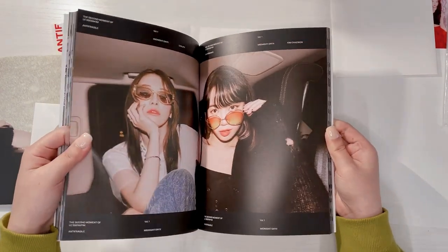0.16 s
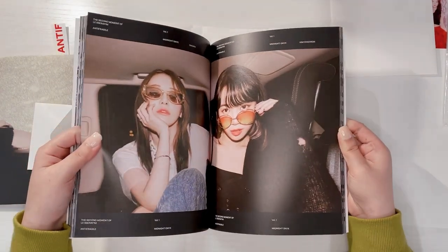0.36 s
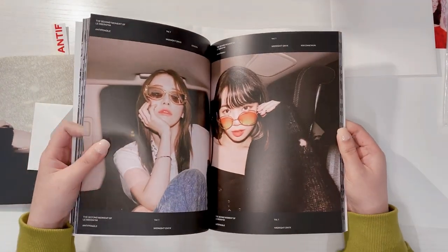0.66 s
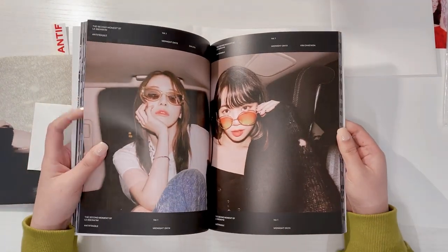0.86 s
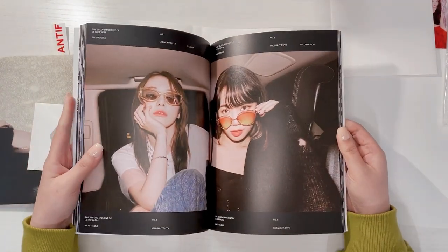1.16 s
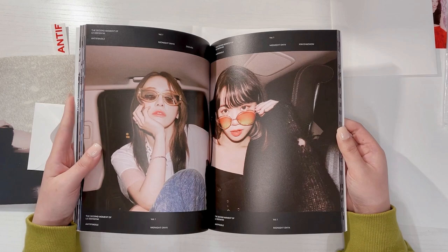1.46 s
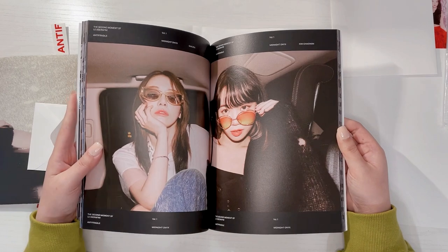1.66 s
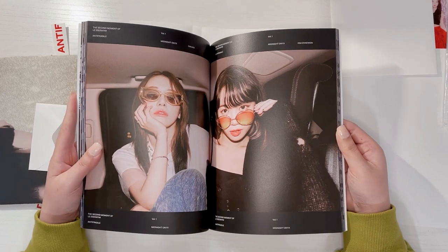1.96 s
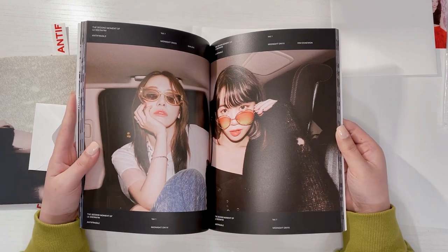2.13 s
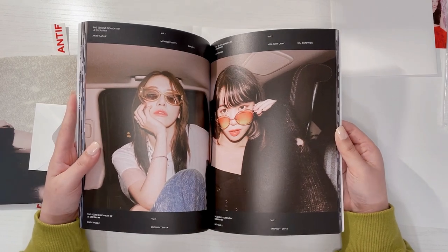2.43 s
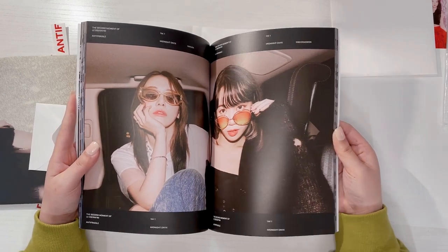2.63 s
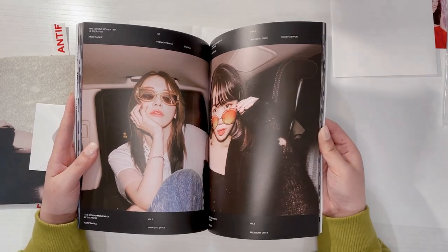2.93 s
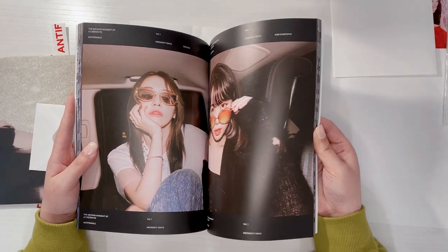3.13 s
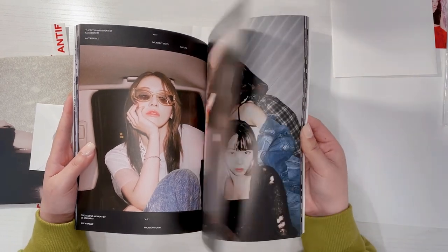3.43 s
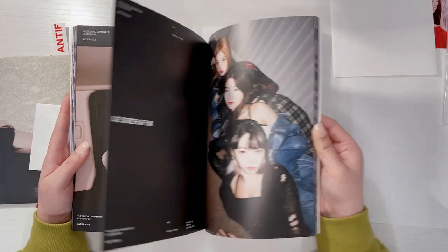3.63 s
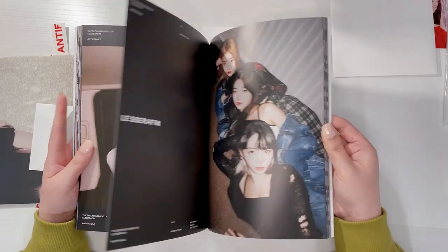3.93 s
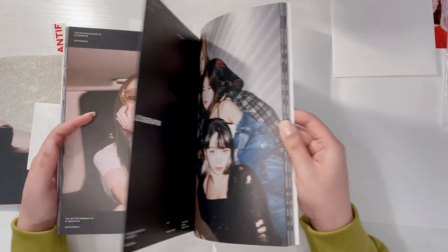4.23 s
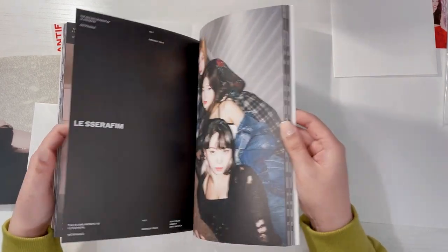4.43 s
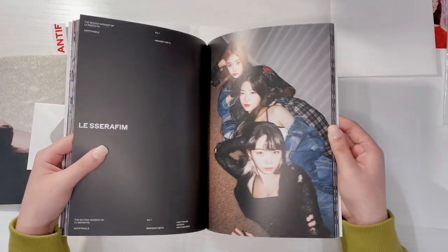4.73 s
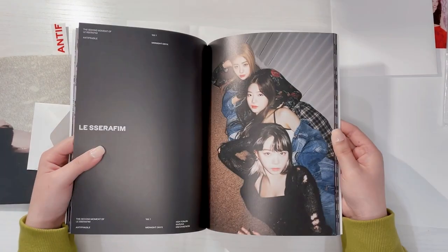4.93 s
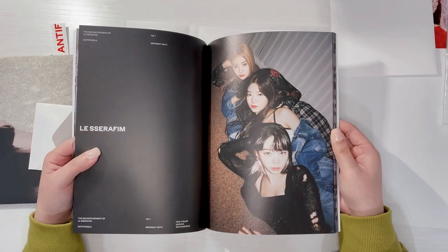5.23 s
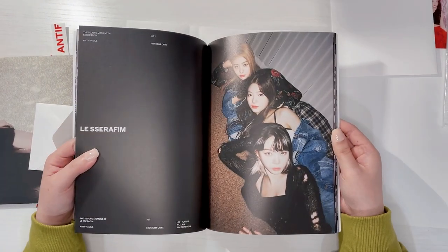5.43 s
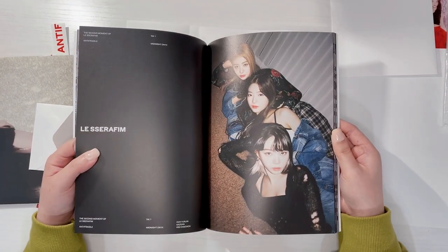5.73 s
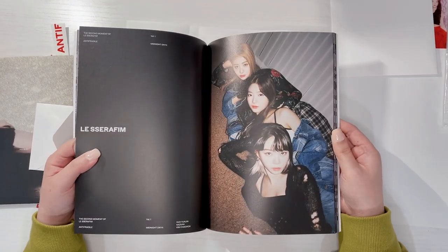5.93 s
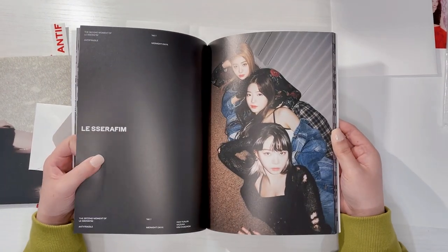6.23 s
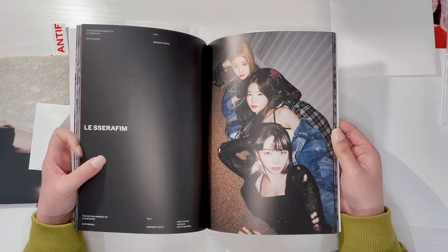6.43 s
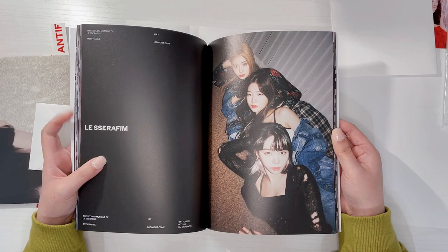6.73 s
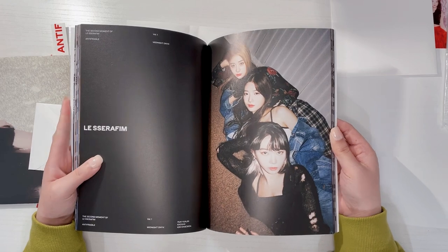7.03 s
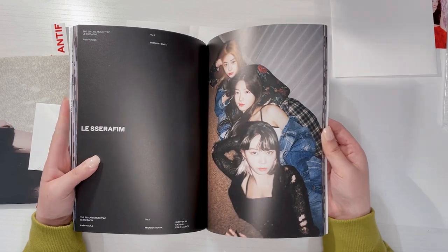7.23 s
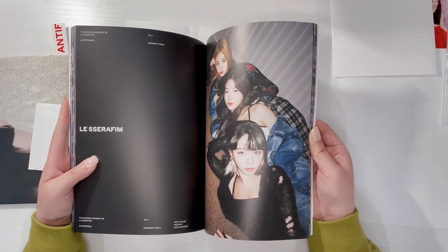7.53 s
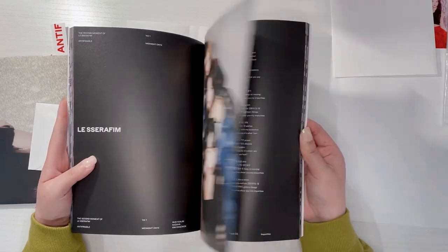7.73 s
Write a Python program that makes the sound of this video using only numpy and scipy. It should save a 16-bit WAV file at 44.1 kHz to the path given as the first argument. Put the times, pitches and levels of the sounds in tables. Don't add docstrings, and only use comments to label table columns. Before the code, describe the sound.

Hands handle a thick glossy book very close to a stereo microphone. Fingers rub and slide over the paper, then the spine knocks the table once, hard and woody. Near-quiet follows, with faint brushes, before a page flick, a busier cluster of rustles and snaps in the middle, another short burst, and a last strong page pop. Quiet small room with low hum.

```python
import sys
import numpy as np
from scipy import signal
from scipy.fft import rfft, irfft, next_fast_len
from scipy.io import wavfile
from scipy.ndimage import uniform_filter1d, map_coordinates

SR = 44100
rng = np.random.default_rng(int(sys.argv[2]) if len(sys.argv) > 2 else 0)


def pcm_store(signal):
    levels = np.round(np.clip(np.atleast_2d(signal), -1, 1) * 32767)
    wavfile.write(sys.argv[1], SR, levels.astype(np.int16).T)


def nominal_scale(level):
    x = np.asarray(level, float) / 20
    return 10 ** x


N = 347067

# (f/Hz, width/Hz, level/dB)
AIR_BANDS = [(10260, 2400, 2), (14700, 4200, 0)]


def slide():
    tight, block, gloss, air = slide_strengths()

    def rub(modes):
        return unit(filtered(grit(spiky_db=1.5), resonant(modes, order=2)))

    # (t/s, f/Hz)
    bend = [(0.06, 1970), (0.2, 2190), (0.61, 1995), (0.75, 2330), (1.12, 1804), (2.6, 2495), (3.55, 1850),
            (3.8, 2057), (4.2, 2300), (4.55, 1900), (4.8, 2250), (5.0, 2150), (5.2, 2350), (5.38, 2300),
            (6.25, 2170), (6.41, 2410), (6.95, 2420), (7.7, 2050)]
    # (f/Hz, width/Hz, level/dB)
    block_bands = [(700, 360, 0.5), (1340, 400, -9)]
    # (f/Hz, width/Hz, level/dB)
    gloss_bands = [(4040, 1800, -2), (5500, 2200, 0.5), (7560, 2200, -3)]
    # (f/Hz, width/Hz, level/dB)
    loose_bands = [(1380, 450, -3.5), (3110, 1600, 1.5)]

    place = np.clip(np.log(curves(bend)[0] / 1700) / np.log(1.28), 0, 2)
    sheet = 0
    for k in range(3):
        nearness = np.clip(1 - abs(place - k), 0, 1)
        sheet = sheet + np.sqrt(nearness) * rub([(1700 * 1.261 ** k, 560, 0)])
    looseness = np.clip(1 + 20 * np.log10(gloss / tight) / 9, 0, 1)
    total = tight * sheet * nominal_scale(-3.5 * looseness)
    parts = [(block, -2.5, block_bands), (gloss, -0.4, gloss_bands),
             (gloss, -2.1, loose_bands), (air, 1.1, AIR_BANDS)]
    for strength, db, modes in parts:
        total = total + strength * nominal_scale(db) * rub(modes)
    return nominal_scale(-0.87) * total


def slide_strengths():
    # (t/s, hold/s, level/dB, block re level/dB, gloss re level/dB)
    rubs = [(0.176, 0.075, -67, -24, -1.5), (0.548, 0.033, -61, -7, -3), (1.031, .04, -69.5, -9, -3.5),
            (1.096, 0.045, -70.5, 0, -1.5), (3.545, 0.091, -72, 5, -3), (3.641, .13, -75.5, -7.5, -3),
            (4.172, 0.035, -66, 1, -1), (4.87, 0.019, -72.5, 5, -17), (4.68, .04, -68, -12, -9),
            (4.628, .025, -54, -16, -9), (4.748, 0.058, -59, -17, -14), (4.936, 0.059, -60, -2.5, -6.5),
            (5.057, .035, -57, -10, -6), (5.195, 0.013, -65, -12, -15), (5.328, .07, -63, -14, -11),
            (5.809, 0.026, -81, 0, -5), (5.91, .14, -78.5, -12, -17), (3.834, 0.037, -76.5, -11, -4.5),
            (6.18, .11, -60, -8.5, -5.5), (0.74, .17, -62, -19, 2)]
    # (t/s, hold/s, level/dB, block re level/dB, gloss re level/dB)
    sweeps = [(0.067, 0.014, -66, 6.5, 0), (0.301, 0.075, -65.5, -1, 1.5), (0.61, 0.12, -56.5, -15.5, -2),
              (1.151, 0.08, -78.5, 5, 2.5), (1.874, .06, -84, -2.5, -3.5), (2.44, .04, -83.5, -3, 3),
              (2.537, 0.047, -81.5, -5, 3), (2.627, 0.098, -76, -8, 2.5), (2.94, .02, -88, 4, -1.5),
              (3.943, 0.09, -84, 16, -6), (4.122, 0.024, -80.5, 3, 3), (4.237, 0.027, -78, 1.5, -1.5),
              (4.412, 0.036, -80, 2, -4), (4.523, 0.041, -58.5, -1, -6.5), (6.32, 0.029, -62.5, 4, 3.5),
              (6.59, 0.088, -86, -8, 8), (6.85, 0.22, -79, 3, 0), (7.25, 0.21, -98, -1, 2)]
    # (t/s, level/dB, block re level/dB, gloss re level/dB)
    brushes = [(2.126, -79, -6, 7), (3.828, -67.5, -12, -12), (5.798, -64, -1.5, -2.5),
               (5.899, -64.5, -6, -3), (5.953, -64.5, -20, -6), (5.979, -68.5, -10.5, -4),
               (6.015, -61.5, -5.5, -2.5), (6.406, -52.5, -3, -3), (1.74, -80.5, 7, -4),
               (1.095, -70.5, 0, 1), (7.385, -84, 0.5, -3), (7.475, -88, -12, 3)]
    # (t/s, level/dB, block re level/dB, gloss re level/dB)
    settles = [(0.914, -66.5, 11, -7), (1.226, -74.5, 10, -5), (3.32, -74, 13.5, -7),
               (3.917, -67.5, 6.5, -0.5), (6.419, -63.5, 0.5, 0.5), (7.559, -73, 11, -6),
               (7.726, -82, 2, -2), (7.775, -68, 7, -7), (7.85, -86.5, 20, -8.5)]
    # (t/s, hold/s, level/dB)
    whispers = [(0.457, .03, -80), (0.571, .33, -71), (2.45, 0.31, -82.5), (3.58, .12, -86.5),
                (4.5, 0.062, -78), (4.616, 0.022, -73), (4.948, 0.03, -75), (5.055, 0.0356, -71),
                (6.192, .06, -70), (6.302, 0.066, -68), (6.584, 0.041, -71.5), (6.86, 0.029, -80.5),
                (7.0, 0.0397, -83)]

    power = contact(*np.transpose(rubs), (1302, 536))
    power = power + contact(*np.transpose(sweeps), (210, 230))
    s, *brush_levels = np.transpose(brushes)
    brush_hold_s = 0.0041
    power = power + contact(s, 0 * s + brush_hold_s, *brush_levels, (1500, 800))
    s, *settle_levels = np.transpose(settles)
    power = power + contact(s, 0 * s, *settle_levels, (1500, 342))
    tight, block, gloss, air = np.sqrt(power)
    s, hold_s, db = np.transpose(whispers)
    air = np.sqrt(air ** 2 + gesture(s, hold_s, [db], (480, 337))[0])
    return tight, block, gloss, air


def contact(s, hold_s, db, block_db, gloss_db, db_per_s):
    air_db = gloss_db - 13 - 0.15 * (db + 65)
    return gesture(s, hold_s, [db, db + block_db, db + gloss_db, db + air_db], db_per_s)


def gesture(s, hold_s, levels_db, db_per_s):
    t = np.arange(0, N, 32) / SR
    late = t - s[:, None]
    rise_db = db_per_s[0] * np.minimum(late, 0)
    fall_db = db_per_s[1] * np.maximum(late - np.abs(hold_s)[:, None], 0)
    power = nominal_scale(2 * np.array(levels_db)) @ nominal_scale(2 * (rise_db - fall_db)) + 1e-14
    return np.array([np.interp(np.arange(N) / SR, t, p) for p in power])


def grit(spiky_db):
    size_db = spiky_db * wobble(700) + 1.8 * wobble(45)
    return streaked(nominal_scale(size_db) * rng.standard_normal(N), patchy_db=2.0)


def streaked(x, patchy_db):
    z = signal.stft(x, nperseg=512)[2]
    patches = uniform_filter1d(rng.standard_normal(z.shape), size=3, axis=0)
    patches = uniform_filter1d(patches, size=14, axis=1)
    return unit(signal.istft(z * nominal_scale(patchy_db * unit(patches)), nperseg=512)[1][:N])


def flicks():
    # (t/s, peak/dB, ring f/Hz, snap re peak/dB, air re peak/dB)
    edge_flicks = [(0.911, -50, 680, -0.5, -16), (1.217, -52, 653, -11, -26), (1.359, -55, 649, -11, -25.5),
                   (2.124, -69.5, 732, -6, -21), (2.254, -55, 611, -12.5, -41),
                   (2.869, -67, 551, -5.5, -27), (3.31, -44, 825, -5.5, -16.5), (3.409, -60, 616, -16, -33),
                   (3.544, -56, 553, -14, -32.5), (3.828, -55.5, 902, -6, -17),
                   (3.917, -54, 650, -6.5, -10), (4.52, -49.5, 633, -3.5, -33), (4.62, -51, 606, -3, -19),
                   (4.841, -38, 700, -14.5, -27.5), (4.96, -43.5, 714, -22, -26),
                   (5.058, -59.5, 640, 6, -18), (6.404, -40, 600, -16, -26), (6.424, -46, 627, -23, -18.5),
                   (6.959, -53.5, 622.5, -12, -37), (7.175, -70, 802, -1.5, -21),
                   (7.449, -68, 854, -4, -29.5), (7.553, -51, 814, -5, -9.5), (7.674, -66.5, 789, -9, -30),
                   (7.754, -28.5, 655, -16.5, -38)]
    ring, snap, air = np.zeros((3, N + SR))
    t = np.arange(SR // 8) / SR
    for s, db, hz, snap_db, air_db in edge_flicks:
        here = slice(round(s * SR), round(s * SR) + len(t))
        noise = rng.standard_normal((2, len(t)))
        noise[:, 20] = 3.2

        tone = np.sin(2 * np.pi * hz * t) + 0.34 * np.sin(2 * np.pi * 1.37 * hz * t)
        tone = tone + 0.53 * nominal_scale(-60 * t / 0.04) * np.sin(2 * np.pi * 3.0 * hz * t)
        ring[here] += nominal_scale(db - 4 - 60 * t / 0.042) * tone * (1 - np.exp(-t / 0.00092)) ** 2

        burst = nominal_scale(-60 * t / 0.0095) + nominal_scale(-17.0 - 60 * t / 0.093)
        burst = burst * (1.1 - np.exp(-t / 0.0004))
        snap[here] += nominal_scale(db + snap_db + 11.5) * burst * noise[0]
        air[here] += nominal_scale(db + air_db + 11.5) * burst * noise[1]
    snap = filtered(snap[:N], resonant([(1820, 4500, -0.5), (6230, 3300, -4.5)]))
    return ring[:N] + snap + filtered(air[:N], resonant(AIR_BANDS))


def shift():
    # (t/s, hold/s, rub level/dB, sway level/dB)
    pushes = [(0.0, 0.021, -65, -69), (0.3, .06, -67, -69.5), (1.76, 0.068, -74.5, -69.5),
              (0.937, .02, -60, -60.5), (2.199, 0.077, -71.5, -68), (2.87, .05, -84, -68.5),
              (3.33, .01, -65, -64.5), (3.438, 0.039, -68.5, -64), (3.748, 0.11, -78, -68.5),
              (3.941, 0.095, -61.5, -66.5), (4.163, .02, -54, -60.5), (4.399, 0.41, -73, -69.5),
              (4.864, 0.0078, -57, -66), (4.972, 0.0098, -63.5, -64.5), (5.147, .03, -72, -63.5),
              (5.926, .04, -72, -67.5), (6.43, 0.0081, -68.5, -70.5), (7.25, .06, -74.5, -73.5),
              (7.588, .02, -69.5, -68.5), (7.781, .01, -54, -63), (7.806, .04, -65.5, -61)]
    # (f/Hz, width/Hz, level/dB)
    thud_bands = [(220, 65, -0.5), (338, 240, 1.5), (520, 99, -3.5)]
    # (f/Hz, width/Hz, level/dB)
    sway_bands = [(44.65, 41, -2.5), (76, 25, 2), (120.73, 32, 0.5)]
    rest_rub_db, rest_sway_db = -82, -69.5

    s, hold_s, rub_db, sway_db = np.transpose(pushes)
    rub = np.sqrt(gesture(s, hold_s, [rub_db], (298.5, 300))[0] + nominal_scale(2 * rest_rub_db))
    swing = np.sqrt(gesture(s, hold_s, [sway_db], (120, 91))[0] + nominal_scale(2 * rest_sway_db))
    push = nominal_scale(3.5 * wobble(25)) * rng.standard_normal(N)
    thud = unit(filtered(push, resonant(thud_bands, order=2)))
    sway = unit(filtered(rng.standard_normal(N), resonant(sway_bands)))
    return nominal_scale(-4.5) * rub * thud + nominal_scale(-1.37) * swing * sway


def knock():
    # (f/Hz, level per Hz/dB)
    blow_spectrum = [(30, -58), (65, -18), (230, -4), (450, -10), (750, -1.5), (1400, -11), (2050, -10),
                     (2600, -24), (3100, -16), (4000, -29), (6400, -36), (8300, -52), (11500, -59),
                     (15000, -68.5)]
    # (f/Hz, level/dB, time to fall 85 dB/s)
    table_tones = [(66, -9, 0.27), (104, -10, 0.33), (227, -1, 0.18), (338.2, -12, 0.22), (706, -2, .06),
                   (1070, -19.5, 0.099), (1900, -12, .05), (3090, -12, 0.04)]
    knock_s, knock_db = 0.3627, -2.5
    spread, edge_hz, air_s = 0.125, 2600, 0.0036

    def travel(f):
        turns = 2 * spread * np.sqrt(np.minimum(f, edge_hz)) + air_s * np.maximum(f - edge_hz, 0)
        return nominal_scale(along(blow_spectrum, f)) * np.exp(-2j * np.pi * turns)

    blow = np.zeros(N)
    blow[round(knock_s * SR)] = 1
    wave = filtered(blow, travel)
    t = np.maximum(np.arange(N) / SR - knock_s - 0.0045, 0)
    ring = sum(nominal_scale(db - 85 * t / t60) * np.sin(2 * np.pi * hz * t) for hz, db, t60 in table_tones)
    ring = ring * (1 - np.exp(-t / 0.003))
    return nominal_scale(knock_db) * (wave / np.abs(wave).max() + nominal_scale(-13.0) * ring)


def room(x):
    # (f/Hz, time to fall 60 dB/s)
    decay = [(100, 0.32), (300, 0.27), (1500, .28), (4000, .3), (10000, .17)]
    hz, t, z = signal.stft(rng.standard_normal((2, SR // 2)), SR, nperseg=256)
    z[1] *= np.clip(hz / 1500, 0.08, 0.6)[:, None]
    fade = nominal_scale(-60 * t / along(decay, hz)[:, None])
    mid, side = signal.istft(z * fade, SR, nperseg=256)[1]
    tail = np.pad([mid + side, mid - side], ((0, 0), (200, 0))) / np.linalg.norm(mid)
    return signal.fftconvolve(x[None], tail, axes=1)[:, :N]


def hum():
    # (f/Hz, level per Hz/dB)
    rumble_spectrum = [(25, 3), (120, -2.5), (160, -6), (250, -15), (400, -17), (1000, -27.5), (2400, -31),
                       (3200, -25), (6000, -35), (7400, -43.5), (9200, -50), (10000, -43.5), (13000, -44),
                       (16000, -53.5)]
    # (f/Hz, level per Hz/dB)
    hiss_spectrum = [(20, -16.5), (100, -4), (400, -5.5), (1200, -12), (2000, -21), (5000, -28),
                     (8000, -27), (11300, -32.5), (12200, -52.5), (16000, -51)]
    mid = unit(filtered(rng.standard_normal(N), lambda f: nominal_scale(along(rumble_spectrum, f))))
    side = unit(filtered(rng.standard_normal(N), lambda f: nominal_scale(along(hiss_spectrum, f))))
    mid = nominal_scale(-74 + 1.2 * wobble(2.6)) * mid
    side = nominal_scale(-78) * side
    return np.array([mid + side, mid - side])


def unit(x):
    return x / np.sqrt(np.mean(x ** 2) + 1e-20)


def along(points, hz):
    f, v = np.transpose(points)
    return np.interp(np.log(hz + 1), np.log(f + 1), v)


def curves(tables):
    rows = np.vstack(tables)
    s, *cols = rows[np.argsort(rows[:, 0])].T
    return [np.interp(np.arange(N) / SR, s, c) for c in cols]


def wobble(rate):
    knots = rng.standard_normal(int(N * rate / SR) + 4)
    return map_coordinates(knots, [np.arange(N) * rate / SR])


def filtered(x, response):
    m = next_fast_len(N + SR // 2)
    return irfft(rfft(x, m) * response(np.fft.rfftfreq(m, 1 / SR)), m)[..., :N]


def resonant(modes, order=1):
    def response(f):
        total = 0
        for k, (c, w, db) in enumerate(modes):
            total = total + (-1) ** k * nominal_scale(db) * 1j * f * w / (c * c - f * f + 1j * f * w)
        return total ** order
    return response


def scene():
    # (f/Hz, phase/radians)
    lag = [(60, .03), (400, 0.12), (2400, 0.6), (5000, 0.25), (6000, 0.84), (7500, 2.4), (9400, 4.2),
           (11000, 5.1), (12200, 6), (14000, 6.8), (15500, 7.3)]
    paper, blow = slide() + shift() + flicks(), knock()
    near = paper + blow + nominal_scale(-15.0) * room(paper) + nominal_scale(-10.5) * room(blow)
    near = filtered(near, lambda f: np.exp(np.outer([-0.5j, 0.5j], along(lag, f))))
    wide = nominal_scale(-13) * np.outer([1, -1], filtered(slide(), lambda f: f < 11800))
    return nominal_scale(np.array([[-0.4], [0.4]])) * near + wide + hum()


def top_cut(x):
    return signal.sosfilt(signal.butter(12, 16650, fs=SR, output="sos"), x)


def record(dry):
    mix = filtered(dry, lambda hz: hz < 15800)
    return top_cut(mix)


dry = scene()
out = record(dry)
pcm_store(out)
```